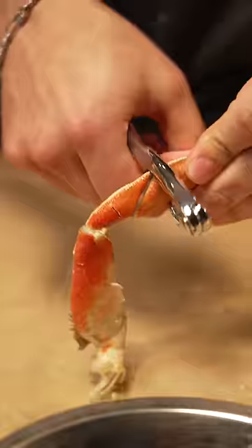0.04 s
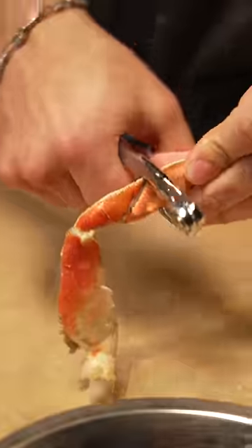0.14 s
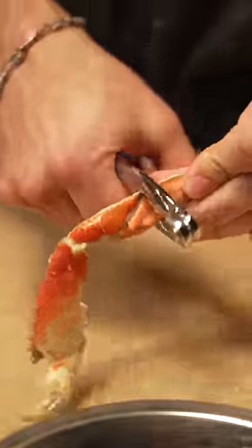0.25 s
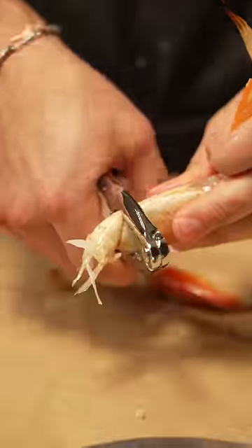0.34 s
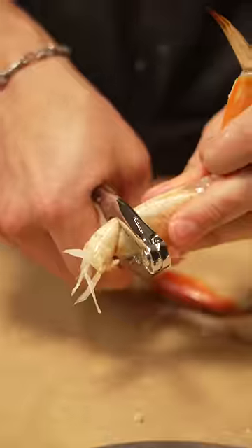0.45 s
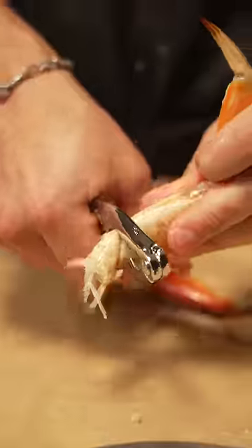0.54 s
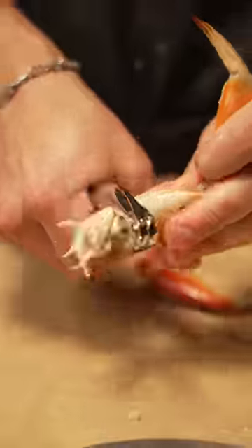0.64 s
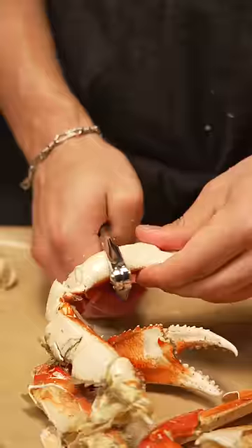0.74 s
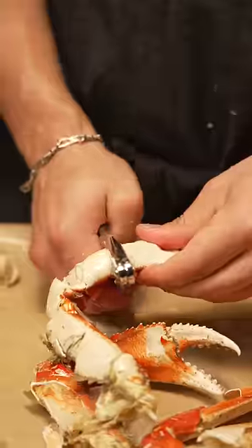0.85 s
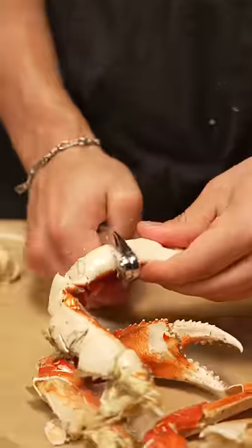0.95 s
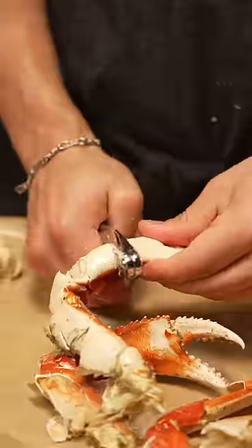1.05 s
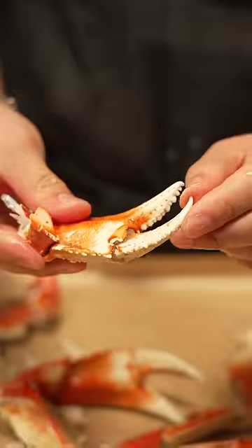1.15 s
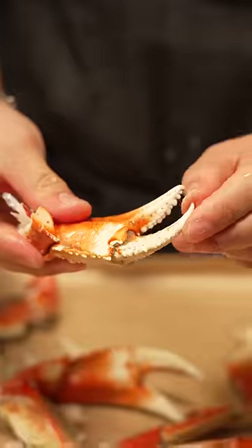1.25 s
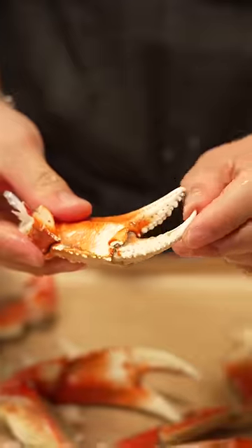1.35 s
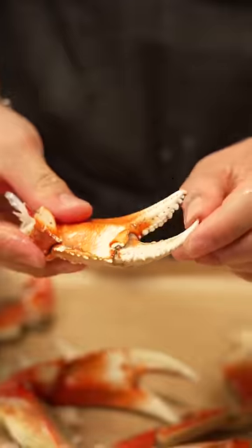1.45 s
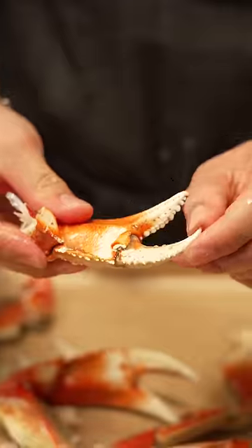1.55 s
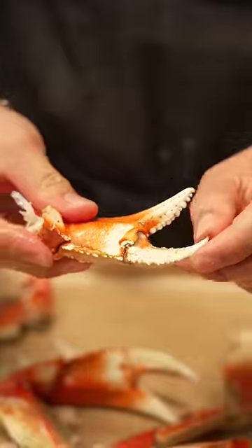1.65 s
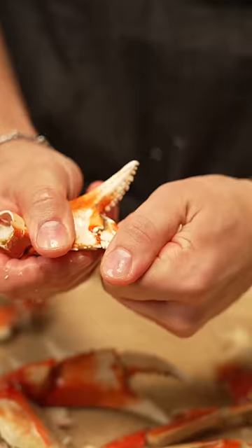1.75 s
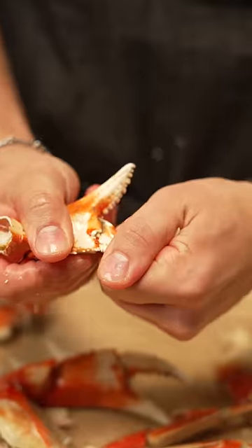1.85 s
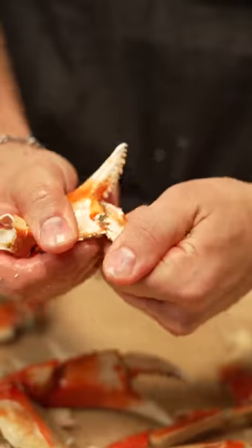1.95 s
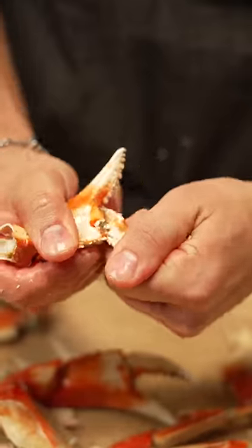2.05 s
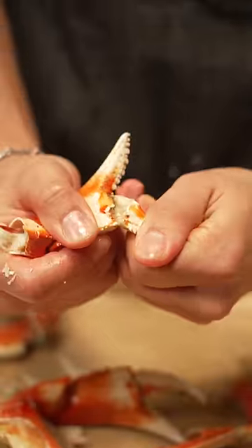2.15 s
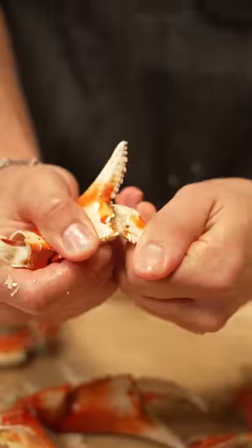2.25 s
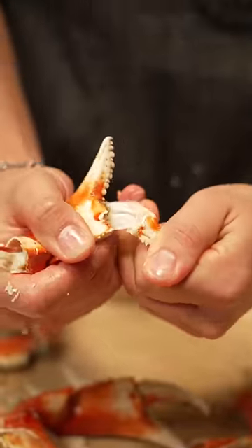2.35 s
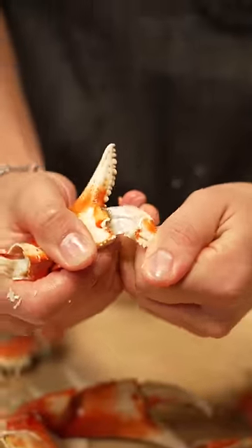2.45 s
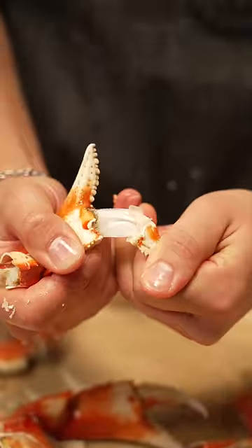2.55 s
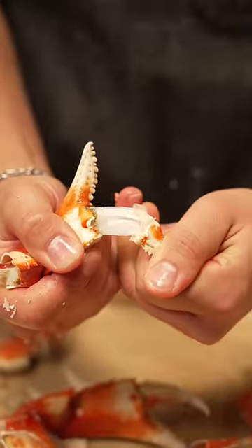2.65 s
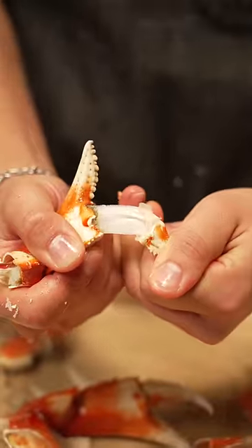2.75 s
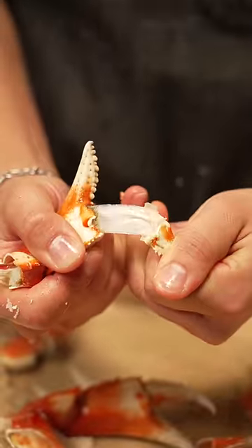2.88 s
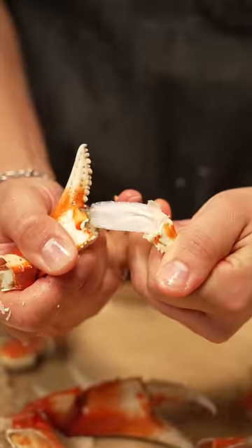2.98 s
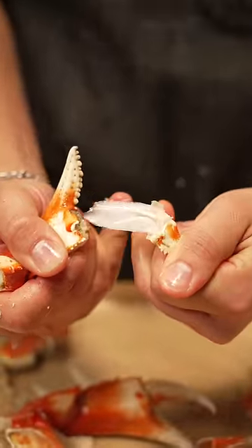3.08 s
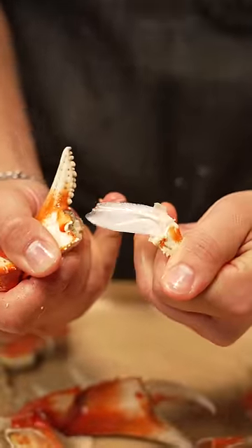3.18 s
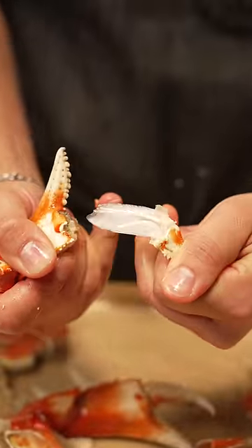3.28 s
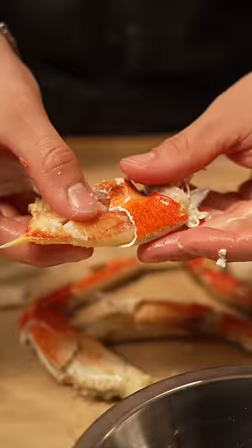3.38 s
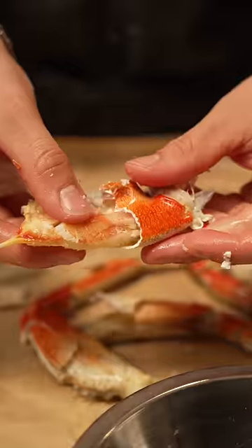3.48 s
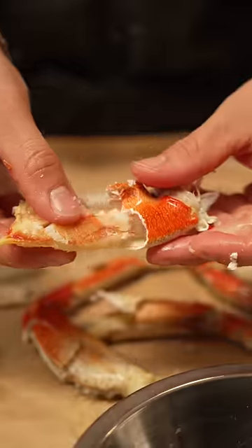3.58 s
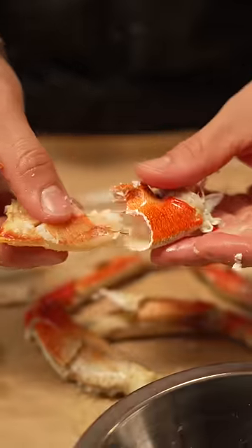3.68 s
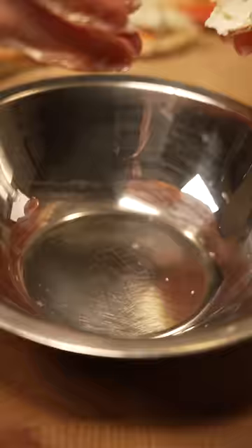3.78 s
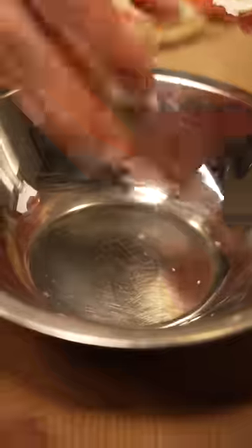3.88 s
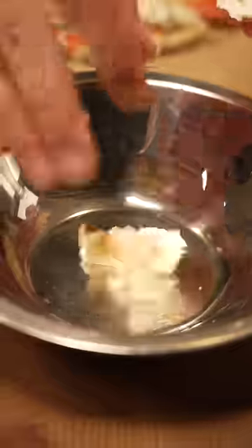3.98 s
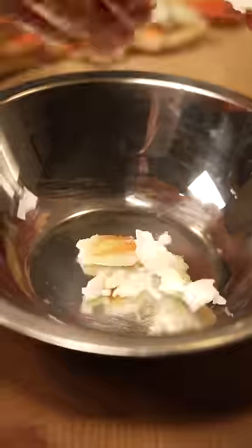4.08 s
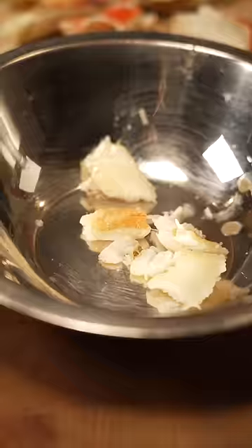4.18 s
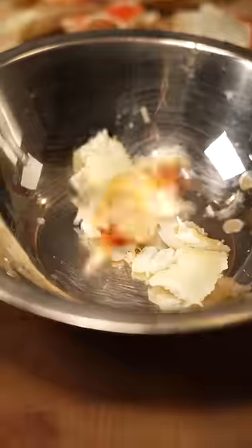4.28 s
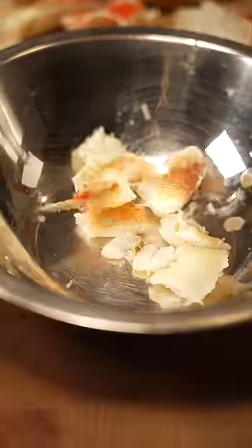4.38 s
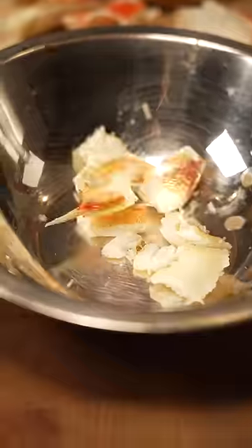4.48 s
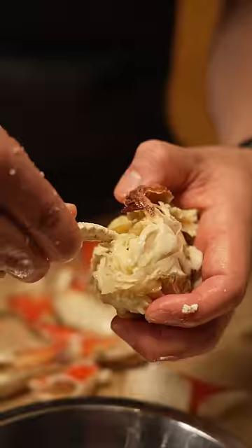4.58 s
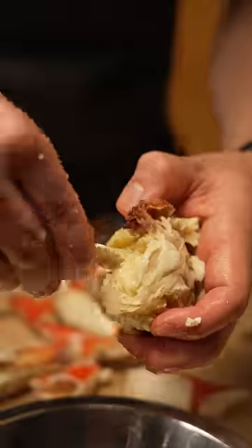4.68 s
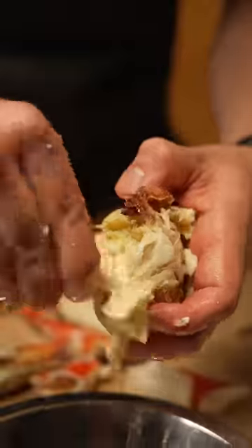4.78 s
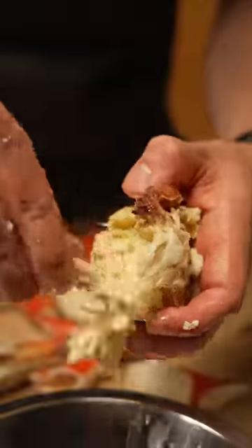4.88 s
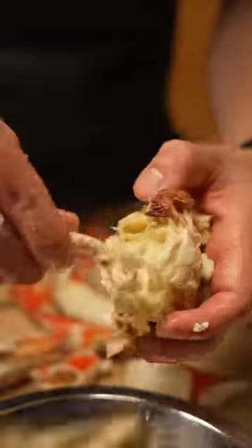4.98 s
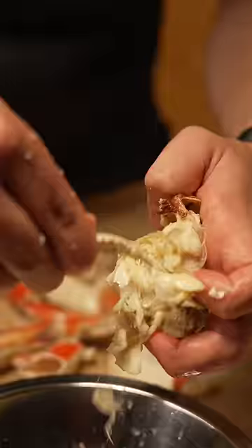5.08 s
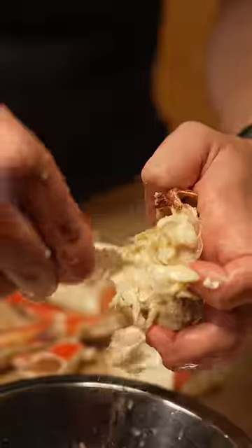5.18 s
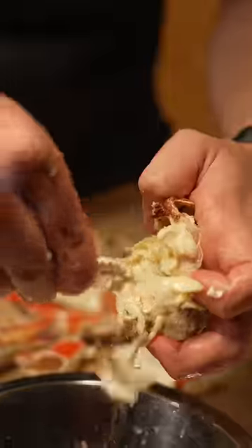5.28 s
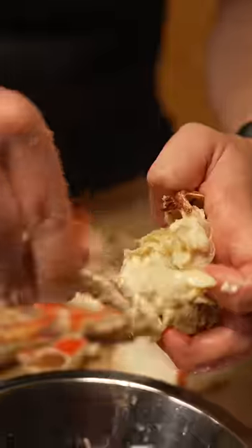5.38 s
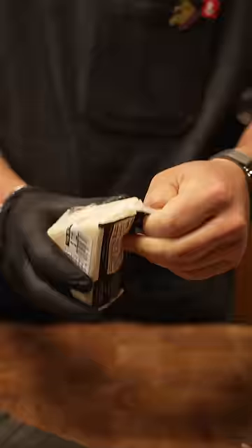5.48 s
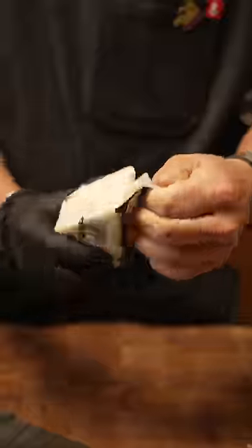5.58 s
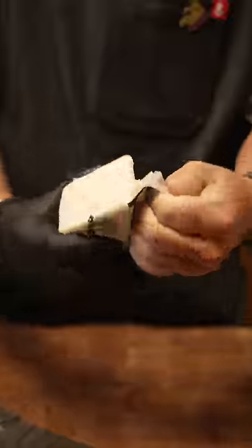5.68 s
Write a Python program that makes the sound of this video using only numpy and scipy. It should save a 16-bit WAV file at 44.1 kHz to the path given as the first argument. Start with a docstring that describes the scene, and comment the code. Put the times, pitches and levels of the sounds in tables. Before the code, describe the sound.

Close, dry snaps of crab shell in a kitchen give way to faint ticking, meat plopping into a metal bowl, fibrous picking and crinkling plastic.

```python
"""Crab legs crack and are picked apart in a hard-walled kitchen: shaped noise bursts with a hard click each.
Fibres and film crackle as swells of tiny clicks; a plastic wrapper snaps at its creases near the end.
Meat slaps into a steel bowl (damped beating modes), bits tap it, and the table bumps (low sagging sines).
Far off a mechanism ticks and a motor murmurs over hum and hiss, both shaped noise.
Hard cuts step the room, hum and hiss levels and chop the echo."""
import sys
import numpy as np
from scipy import signal
from scipy.fft import rfft, irfft
from scipy.io import wavfile
from scipy.ndimage import uniform_filter1d

SR = 44100
rng = np.random.default_rng(int(sys.argv[2]) if len(sys.argv) > 2 else 0)


def file_out(sig):
    """Save sig as 16-bit WAV at sys.argv[1]."""
    # one column per channel
    cols = np.atleast_2d(sig).T
    # limit, then scale
    lim = np.clip(cols, -1, 1)
    pcm = np.round(lim * 32767).astype(np.int16)
    wavfile.write(sys.argv[1], SR, pcm)


N = 252693
LEAD_S = .2  # rendered ahead of t = 0, then dropped
M = N + round(LEAD_S * SR)

# sections between cuts: start/s, room/dB, hum gain/dB, hiss gain/dB, hollow ring of the piece f/Hz,
# its width/Hz, its gain/dB, shell ring gain/dB, spread of its snaps/oct
SECTIONS = [(-.2, -17.5, 0, -9, 3200, 900, 10.5, -4, .85), (0.031, -23, 2.5, 0.5, 2020, 398, 11, 9, .6),
            (0.364, -23.5, 2.5, 3, 4470, 2010, -3, 10, .35),
            (0.5866, -18.5, 2.5, -1.5, 3670, 1494, 3.5, 1.5, .75),
            (0.751, -23, 1.5, 9.5, 980, 906, 11, 5.5, .7), (1.116, -22, 1.5, -2, 2230, 900, 1, 0, .65),
            (2.1, -25, 0, -2.5, 3460, 1507, -2, 0, .55), (3.348, -26.5, 1, -2.5, 805, 797, -1, -8.5, .6),
            (4.183, -29, 7, -3, 812, 794, 6.5, -1, .6), (4.59, -34.5, 0, -0.5, 4430, 1500, 5.5, 6.5, .45),
            (5.52, -31.5, 5.5, 15.5, 2940, 1520, -27, 13, .55)]
# shell fractures: t/s, level/dB, centre f/Hz, length/ms
SHELL_SNAPS = [(-.12, -4, 4700, 14.5), (0.1127, -39, 7000, 1.9), (0.1505, -38, 8000, 1.2),
               (0.1535, -0.5, 7300, 2.9), (0.1576, -10, 8000, 1.6), (0.1596, -9.5, 7400, 1.1),
               (0.1656, -1, 9450, 1.3), (0.1694, -5, 9000, 1), (0.1712, 0, 8200, 4.3),
               (0.1752, 1, 9000, 2.2), (0.1768, 0.5, 8700, 2.4), (0.179, 2, 5700, 4.9),
               (0.185, 3, 8050, 2.1), (0.42, -32.5, 5500, 3), (0.4361, -26, 7050, 1.7),
               (0.446, -32, 6950, 2.6), (0.454, -19.5, 6870, 1.7), (0.4584, -21, 6570, 2.4),
               (0.4673, 1, 7700, 3.4), (0.4716, -10, 7800, 4.8), (0.4768, 1, 7800, 3.1),
               (0.5678, -21, 5900, 3.6), (0.579, -1.5, 9000, 0.86), (0.5868, -4.5, 8060, 3),
               (0.59, 2, 6200, 7.8), (0.594, -1.5, 5910, 3.9), (0.597, -4.5, 5500, 4.8),
               (0.6054, 0.5, 10000, 2.2), (0.805, -24, 5970, 4.1), (0.8184, 2.5, 8900, 2),
               (0.8261, -10.5, 6050, 3.1), (0.831, -6, 8000, 1.9), (0.8395, -9, 9200, 1.2),
               (0.8499, -11, 7500, 1.4), (0.8576, 2.5, 9050, 3.2), (0.8605, 6.5, 7640, 1.25),
               (0.862, 3, 7800, 2.3), (0.9494, -10, 9800, 1), (0.954, 0.5, 8400, 5.2),
               (0.958, 5, 6560, 2.1), (0.9698, -4.5, 8440, 4.8), (1.7455, -20, 9700, 5.8),
               (1.7584, -18, 7800, 1.6), (1.7731, -9.5, 9100, 1.7), (1.7773, -20, 5500, 5),
               (1.8985, -26.5, 4000, 5.2), (1.9033, 3.5, 7200, 2.6), (1.9142, 6, 7400, 2.7),
               (2.298, -33.5, 5700, 2.7), (2.306, -24.5, 4940, 0.89), (2.3188, -27, 5030, 2.2),
               (2.338, -36, 3000, 2.6), (2.352, -40, 6490, 2.5), (4.6278, -28, 5700, 6.2),
               (4.6681, -37.5, 5900, 1.6), (4.712, -38.5, 6700, 11), (4.7285, -34, 8350, 20),
               (4.7741, -28, 6470, 4), (4.882, -38.5, 7450, 3.5), (4.9115, -46, 5000, 3),
               (4.955, -39, 6500, 2.3), (4.9844, -41, 6500, 2.6), (5.0769, -38.5, 5000, 1.8),
               (5.187, -48.5, 3500, 2), (5.1988, -12.5, 5000, 4.2), (5.2105, -10.5, 4770, 3.3),
               (5.223, -11.5, 8200, 2.1), (5.2635, -25, 8500, 0.9), (5.292, -12, 9800, 0.42),
               (5.313, -18.5, 7800, 2.5), (5.323, -19, 7000, 3.1), (5.3324, -20, 7200, 1.9),
               (5.359, -19, 6330, 2), (5.3669, -10, 8250, 0.36), (5.3703, -2, 9550, 0.79),
               (5.3768, -30, 8600, 0.64)]
# short dull knocks: the leg handled, a slap's contact at 3.82 s, the wrapper after 5.7 s:
# t/s, level/dB, centre f/Hz, length/ms
DULL_KNOCKS = [(0.07, -36, 500, 36), (0.0871, -34, 502, 12), (0.129, -31, 780, 5.1),
               (0.177, -25.5, 600, 31), (0.1718, -24, 600, 4.6), (0.186, -28, 502, 5.7),
               (0.467, -26.5, 603, 3.2), (0.476, -23, 2104, 15), (0.59, -8.5, 1020, 3.8),
               (0.804, -19, 1110, 4.6), (0.8263, -16.5, 1127, 4.2), (0.8574, -27, 1504, 7.2),
               (0.957, -14, 1578, 6), (1.904, -10, 2060, 4.7), (1.914, -17.5, 1390, 4),
               (3.8232, -20, 1200, 2.3), (0.601, -22, 896, 5), (5.207, -30, 2000, 15),
               (5.701, -20.5, 1370, 7.9), (5.722, -17, 1320, 3.1)]
# hollow pops of shell, and from 5.09 s light taps of bits falling into the bowl:
# t/s, level/dB, centre f/Hz, length/ms
POPS_AND_TAPS = [(0.186, -13.5, 2133, 5.5), (1.759, -31.5, 2350, 6.1), (1.778, -23, 2316, 6),
                 (4.628, -37, 1710, 4.5), (4.9115, -36.5, 2950, 4), (4.955, -39.5, 2950, 3.4),
                 (5.0769, -38, 3820, 2.1), (5.09, -37, 1534, 10), (5.091, -39.5, 468, 14),
                 (5.458, -41.5, 1486, 23), (5.459, -40.5, 473, 14)]
# tiny dry flecks of shell: t/s, level/dB
SHELL_FLECKS = [(1.0043, -23.5), (1.1545, -44), (1.326, -44), (1.4432, -41.5), (1.7038, -41.5),
                (3.4174, -34.5), (3.6562, -49.5)]
# creases snapping in the wrapper: t/s, level/dB, centre f/Hz
WRAPPER_SNAPS = [(5.561, -21, 4360), (5.5727, -35, 7900), (5.5887, -16, 3460), (5.6424, -4.5, 5240),
                 (5.653, -5.5, 8500), (5.6557, -7, 4670), (5.672, -6, 5000), (5.681, -7, 6400),
                 (5.687, -12, 6300), (5.692, -14, 5700), (5.699, -2, 6750), (5.7019, -2.5, 4670),
                 (5.715, -6, 7000), (5.7196, -3.5, 6600), (5.7223, -1, 6000), (5.727, -16, 6000)]
# wet meat meeting steel: t/s, thud level/dB, thud f/Hz, splash level/dB
MEAT_SLAPS = [(3.801, -43, 399, -45.5), (3.821, -26.5, 350, -37), (3.908, -43, 1490, -45),
              (4.0185, -16, 780, -28.5), (4.022, -18, 1036, -18), (4.076, -59, 796, -36),
              (4.151, -56.5, 802, -47), (4.32, -35.5, 800, -16.5), (4.326, -35, 1520, -16),
              (4.328, -24, 412, -13), (4.3361, -20, 900, -8.5), (4.348, -33, 900, -23)]
# pulls on fibres: peak t/s, peak level/dB, centre f/Hz, rise/(dB/s), fall/(dB/s)
FIBRE_PULLS = [(2.338, -51, 2963, 451, 451.5), (4.66, -58.5, 5000, 385, 73.5),
               (4.76, -39.5, 7230, 504, 602), (4.79, -61, 7000, 602, 242),
               (5.225, -46.5, 6000, 1197, 152.5), (5.28, -56, 9100, 299, 299), (5.325, -44, 6000, 600, 300),
               (5.365, -33.5, 8300, 400, 780), (5.41, -55, 6450, 300, 148)]
# pulls on film: peak t/s, peak level/dB, centre f/Hz, rise/(dB/s), fall/(dB/s)
FILM_PULLS = [(5.55, -76, 6300, 420, 300), (5.595, -48, 7500, 910, 200), (5.61, -22, 7300, 610, 314),
              (5.625, -52, 7500, 303, 900), (5.66, -59, 4950, 153, 100), (5.725, -13.5, 6130, 453, 100)]
# steel bowl modes: f/Hz, relative level/dB, undamped t60/s
BOWL_MODES = [(197, -7, 0.058), (406, -1.5, 0.098), (449, -10.5, 0.57), (922, 0.5, 0.026),
              (1378, -11.5, 0.49), (1442, -12.5, 0.38), (1524, 2.5, 0.088), (2159, -30, 0.41),
              (2900, -32, 0.34), (5500, -32, 0.27), (7950, -18, 0.17), (8430, -18.5, 0.21),
              (11770, -13, 0.13)]
# blows on the bowl: t/s, level/dB, deep modes gain/dB, thin modes gain/dB, t60 factor set by the contents
BOWL_BLOWS = [(4.019, -28.5, -9, 1, 1.1), (4.0239, -31, -1, 13, 0.47), (4.076, -55.5, -9.5, 19, 0.89),
              (4.327, -30.5, 10, -7, 1.16), (4.336, -37.5, -7, 15.5, 1.1), (4.348, -26, -3, -12, 0.58)]
# dull bumps through the table: t/s, peak level/dB, settled f/Hz
TABLE_BUMPS = [(1.433, -38.5, 98.7), (2.155, -33.5, 92.4), (2.244, -35.5, 86), (2.397, -34, 99),
               (2.518, -40, 100), (3.195, -32.5, 92.5), (3.798, -37.5, 70), (3.831, -25.5, 90),
               (3.911, -23.5, 91), (4.009, -34, 132), (4.109, -38, 92), (4.322, -31, 113.4),
               (5.182, -40.5, 93.6)]
# runs of ticks: first t/s, end t/s, rate/(1/s)
TICK_RUNS = [(1.172, 1.75, 16.15), (2.118, 2.54, 14.6), (2.554, 3.36, 13.93)]
# ringing parts of the mechanism: f/Hz, t60/s, level/dB
TICK_MODES = [(1890, 0.058, -56), (2490, 0.082, -59.5), (3350, 0.023, -55.5), (3730, 0.043, -55.5),
              (4720, 0.046, -68.5), (5620, 0.046, -61), (7000, .03, -63), (8630, 0.04, -68)]
# motor bands: f/Hz, width/Hz, level/dB
MOTOR_BANDS = [(401, 9.8, -74), (1210, 430, -70), (1580, 49, -68), (1830, 26, -74)]
# hum spectrum before section gain: f/Hz, level/(dB per Hz)
HUM_SPECTRUM = [(25, -72), (52, -90.5), (95, -71.5), (130, -69.5), (230, -73.5), (400, -79.5), (800, -85.5),
                (1600, -94), (2400, -100), (4000, -112)]
# hiss spectrum before section gain: f/Hz, level/(dB per Hz)
HISS_SPECTRUM = [(1000, -100), (4000, -101), (9000, -102), (16000, -103)]
# echo decay: f/Hz, t60/s
ROOM_DECAY = [(250, 0.39), (660, 0.5), (1740, .48), (4590, 0.52), (8000, 0.48), (12100, 0.35), (16000, 0.2)]

SHELL_RING_HZ, SHELL_RING_WIDTH_HZ = 6130, 1000
GRIT_DB, CLICK_DB, SOFT_CLICK_DB = -5, 3, -7  # re snap level; blunt or wet contacts hardly click
LOW_SKIRT = 0.96  # snap colour falls off faster below centre
WRAP_MS = 2.95
KNOCK_OCT, POP_OCT = 0.59, .09
FLECK_HZ, FLECK_OCT, FLECK_MS = 13200, .22, .8
THUD_OCT, THUD_MS = 0.59, 12
SPLASH_HZ, SPLASH_OCT, SPLASH_MS = 7610, 0.73, 6.6
TWIN_RATIO = 1.008  # pitch of each bowl mode's beating twin
BUMP_RISE_S, BUMP_SAG_S = 0.01, .003
BUMP_EXCESS = 1.6  # initial excess pitch, as a fraction of the settled f
EARLY_DB, WALLS_S, WALLS_RISE_S = -6.5, 0.011, 0.0048  # faint scatter, then the walls answer
EDGE_HZ = 16500


def amp(db):
    """dB to amplitude factor."""
    return 10 ** (np.asarray(db) / 20)


def evened(x):
    """Scales to unit RMS."""
    return x / np.sqrt(np.mean(x ** 2) + 1e-20)


def read(points, hz):
    """Interpolates a spectrum table over log frequency."""
    f, value = np.transpose(points)
    return np.interp(np.log(hz + 1), np.log(f + 1), value)


def add(mix, s, sound):
    """Mixes a sound in at s seconds."""
    part = mix[round((s + LEAD_S) * SR):][:len(sound)]
    part += sound[:len(part)]


def resonate(x, hz, width_hz, db):
    """Lifts or dips one resonance by db."""
    b, a = signal.iirpeak(hz, hz / width_hz, SR)
    return x + (amp(db) - 1) * signal.lfilter(b, a, x)


def contacts():
    """Every sharp contact as (t/s, level/dB, centre f/Hz, spread/oct, length/ms, click/dB)."""
    start, spread = np.transpose(SECTIONS)[[0, -1]]
    brittle = SHELL_SNAPS + [(s, db, hz, WRAP_MS) for s, db, hz in WRAPPER_SNAPS]
    return ([(s, db, hz, spread[start < s][-1], ms, CLICK_DB) for s, db, hz, ms in brittle]
            + [(s, db, hz, KNOCK_OCT, ms, SOFT_CLICK_DB) for s, db, hz, ms in DULL_KNOCKS]
            + [(s, db, hz, POP_OCT, ms, SOFT_CLICK_DB) for s, db, hz, ms in POPS_AND_TAPS]
            + [(s, db, FLECK_HZ, FLECK_OCT, FLECK_MS, CLICK_DB) for s, db in SHELL_FLECKS]
            + [(s, db, hz, THUD_OCT, THUD_MS, SOFT_CLICK_DB) for s, db, hz, _ in MEAT_SLAPS]
            + [(s, db, SPLASH_HZ, SPLASH_OCT, SPLASH_MS, SOFT_CLICK_DB) for s, *_, db in MEAT_SLAPS])


def snaps(rows):
    """A snap is a burst of uneven micro-fractures; the walls get its colour averaged over all directions."""
    near, around = np.zeros(M), np.zeros((3, M))
    t = np.arange(2048) / SR
    f = np.fft.rfftfreq(2048, 1 / SR) + 1
    chance = rng.standard_normal((len(rows), 2, 2048))
    for k, (row, (noise, size)) in enumerate(zip(rows, chance)):
        s, db, hz, spread, ms, click_db = row
        skirt = 2.4 * spread * np.where(f < hz, LOW_SKIRT, 1)
        colour = np.exp(-(np.log2(f / hz) / skirt) ** 2)

        grit = evened(irfft(rfft(noise * amp(4.8 * size)) * colour))
        decay = amp(-14 * t / (ms / 1000))  # 14 dB down after one length
        add(near, s, amp(db + GRIT_DB) * grit * np.minimum(t / 1e-4, 1) * decay)

        pulse = np.roll(irfft(colour), 128)[:256]
        # the first break is one hard click, peaking 8 samples in
        add(near, s + (8 - 128) / SR, amp(db + click_db) * pulse / pulse.max())
        unit_pulse = pulse / np.linalg.norm(pulse)
        add(around[k % 3], s, amp(db) * np.sqrt(ms * SR / 1000) * unit_pulse)
    return near, around


def crackle(rows, per_s, spread_db):
    """Fibre or film pulls: a dense train of tiny uneven clicks, blended from dull and bright bands."""
    size = amp(spread_db * np.minimum(rng.exponential(1, M), 4)) * (rng.random(M) < per_s / SR)
    clicks = signal.oaconvolve(size, np.exp(-np.arange(100) / 20.0))[:M] * rng.standard_normal(M)
    dull_band = signal.butter(2, [2000, 6000], "band", fs=SR, output="sos")
    bright_band = signal.butter(2, [5500, 14000], "band", fs=SR, output="sos")
    dull = evened(signal.sosfilt(dull_band, clicks))
    bright = evened(signal.sosfilt(bright_band, clicks))
    out, t = np.zeros(M), np.arange(M) / SR - LEAD_S
    for s, db, hz, rise, fall in rows:
        share = np.clip((hz - 3500) / 6000, 0, 1)
        span = abs(t - s) < .3
        lag = t[span] - s
        swell = amp(db + np.minimum(rise * lag, -fall * lag))
        out[span] += swell * ((1 - share) * dull[span] + share * bright[span])
    return out


def bowl():
    """Every blow rings the same steel modes, each split into a beating pair."""
    out, t = np.zeros(M), np.arange(SR // 2) / SR
    hz, db, t60 = np.transpose(BOWL_MODES)[:, :, None]
    chance = rng.standard_normal((len(BOWL_BLOWS), 2, len(BOWL_MODES), 1))
    for (s, blow_db, deep_db, thin_db, damp), (spot_db, twin) in zip(BOWL_BLOWS, chance):
        # the spot struck shades each mode
        level_db = blow_db + db + deep_db * (hz < 700) + thin_db * (hz > 2000) + spot_db
        pair = np.sin(2 * np.pi * hz * t) + 0.3 * np.sin(2 * np.pi * hz * TWIN_RATIO * t + 3 * twin)
        # thin modes crowd together
        shimmer = evened(uniform_filter1d(rng.standard_normal(pair.shape), 110, axis=1))
        pair *= np.where(hz > 4000, shimmer, 1 + 0.4 * shimmer * (hz > 700))
        rings = amp(level_db - 60 * t / (t60 * damp)) * pair
        add(out, s, np.minimum(t / 0.00034, 1) * rings.sum(0))
    return out


def table():
    """Low swings build, die and sag in pitch as the table takes the weight."""
    out, t = np.zeros(M), np.arange(SR // 5) / SR
    swell = t / BUMP_RISE_S * np.exp(1 - t / BUMP_RISE_S)
    warped_t = t + BUMP_EXCESS * BUMP_SAG_S * (1 - np.exp(-t / BUMP_SAG_S))
    for s, db, hz in TABLE_BUMPS:
        add(out, s, amp(db) * swell * np.sin(2 * np.pi * hz * warped_t))
    return out


def ticker():
    """A small loose mechanism ticks evenly, its parts ringing briefly and roughly."""
    out, t = np.zeros(M), np.arange(4000) / SR
    hz, t60, db = np.transpose(TICK_MODES)[:, :, None]
    for first, end, rate in TICK_RUNS:
        for s in np.arange(first, end, 1 / rate):
            noise = rng.standard_normal((len(hz), len(t)))
            rattle = 1 + 0.5 * evened(uniform_filter1d(noise, 45, axis=1))
            rings = amp(db - 60 * t / t60) * rattle * np.sin(2 * np.pi * hz * t)
            add(out, s, np.minimum(t / 0.00088, 1) * rings.sum(0))
    return out


def motor():
    """A motor murmurs once, for 0.45 s: resonant bands of noise that waver."""
    out, noise = np.zeros(M), rng.standard_normal(round(.45 * SR))
    for hz, width_hz, db in MOTOR_BANDS:
        b, a = signal.iirpeak(hz, hz / width_hz, SR)
        add(out, 3.35, amp(db) * evened(signal.lfilter(b, a, noise)))
    return out


def air(points, patchy_db):
    """Hum or hiss: noise of a steady spectrum with drifting patches."""
    frames, hz = M // 256 + 5, np.fft.rfftfreq(1024, 1 / SR)
    a, b, patches = rng.standard_normal((frames, 513, 3)).T
    patches = evened(uniform_filter1d(uniform_filter1d(patches, 6, 0), 10, 1))
    level = amp(read(points, hz)[:, None] + patchy_db * patches)
    z = (a + 1j * b) * level * np.sqrt(SR / 1024)
    return signal.istft(z, nperseg=1024, noverlap=768)[1][:M]


def kitchen():
    """Impulse response: sparse echoes swell early, then each band dies at its own speed."""
    taps = np.zeros(SR // 2)
    slots = np.arange(0, len(taps) - 8, 8)
    taps[slots + rng.integers(0, 8, len(slots))] = rng.choice([-1., 1.], len(slots))
    hz, t, z = signal.stft(taps, SR, nperseg=256)
    tail = signal.istft(z * amp(-60 * t / read(ROOM_DECAY, hz)[:, None]), SR, nperseg=256)[1]
    tail *= np.clip((np.arange(len(tail)) / SR - WALLS_S) / WALLS_RISE_S, amp(EARLY_DB), 1)
    tail[:round(.004 * SR)] = 0
    return tail / np.linalg.norm(tail)


def scene():
    """Sets the near sounds in the room section by section, then adds the far sounds uncut."""
    near, around = snaps(contacts())
    fine = crackle(FIBRE_PULLS, 1400, 1.1) + crackle(FILM_PULLS, 3000, 0.92) + bowl()
    near = near + fine
    around[0] += amp(10.0) * fine
    far = table() + ticker() + motor()
    hum, hiss = air(HUM_SPECTRUM, 0.9), air(HISS_SPECTRUM, .7)
    cuts = [round((row[0] + LEAD_S) * SR) for row in SECTIONS] + [M]
    out = np.zeros(M)
    for a, b, section in zip(cuts, cuts[1:], SECTIONS):
        _, room_db, hum_db, hiss_db, hollow_hz, width_hz, hollow_db, shell_db, _ = section
        # each cut chops the echo off
        echo = sum(signal.oaconvolve(side[a:b], kitchen())[:b - a] for side in around)
        echo = resonate(echo, hollow_hz, width_hz, hollow_db)
        echo = resonate(echo, SHELL_RING_HZ, SHELL_RING_WIDTH_HZ, shell_db)
        out[a:b] = near[a:b] + amp(room_db) * echo + amp(hum_db) * hum[a:b] + amp(hiss_db) * hiss[a:b]
    return (out + far)[None, -N:]


def record(dry):
    """The top droops, the loudest snaps overload the input, deep bass is cut; then the band limit."""
    dulled = signal.lfilter(*signal.butter(1, 13000, fs=SR), dry)
    squashed = dulled / (1 + dulled ** 4) ** (1 / 4)
    trimmed = signal.lfilter(*signal.butter(2, 35, "high", fs=SR), squashed)
    band_limit = signal.firwin(511, EDGE_HZ, window=("kaiser", 9), fs=SR)
    return signal.oaconvolve(trimmed, band_limit[None], "same")


dry = scene()
out = record(dry)
file_out(out)
```